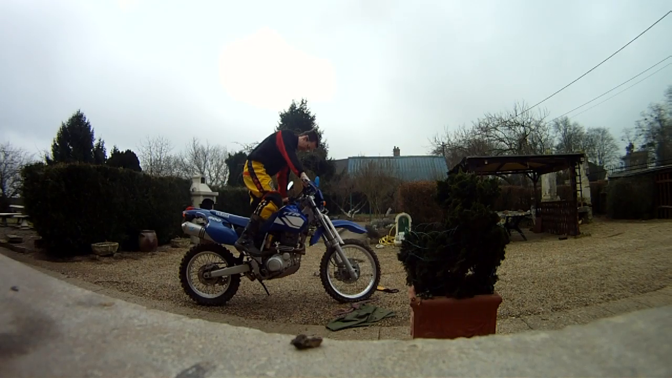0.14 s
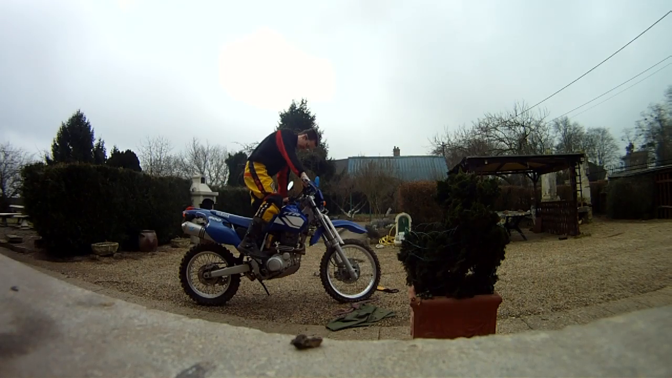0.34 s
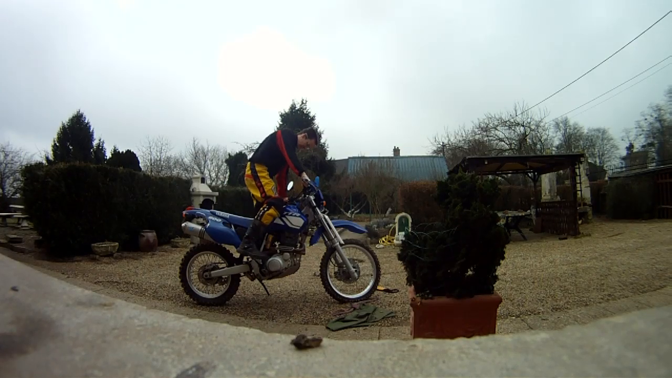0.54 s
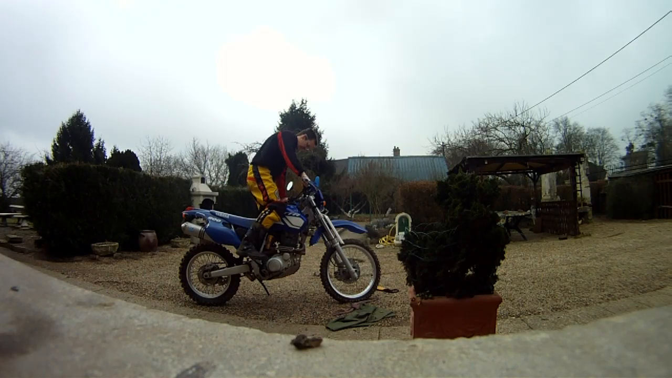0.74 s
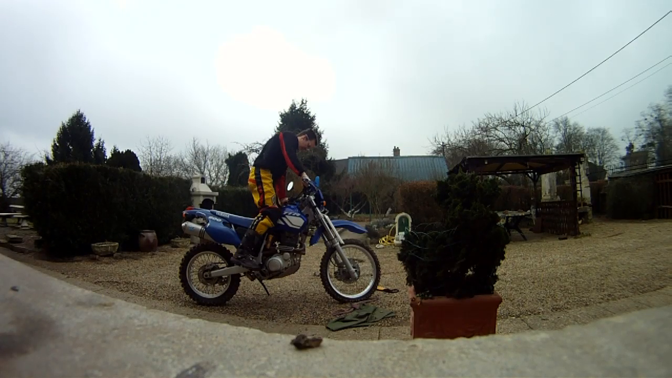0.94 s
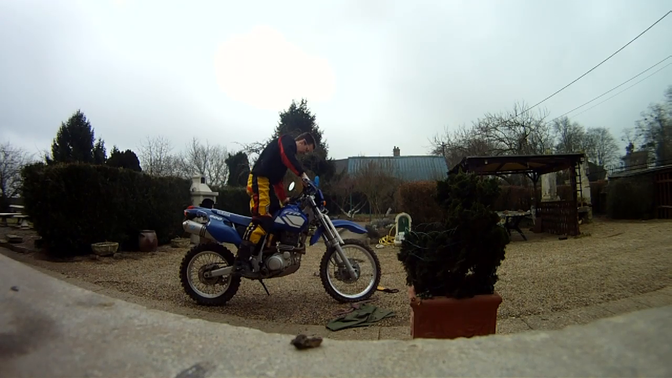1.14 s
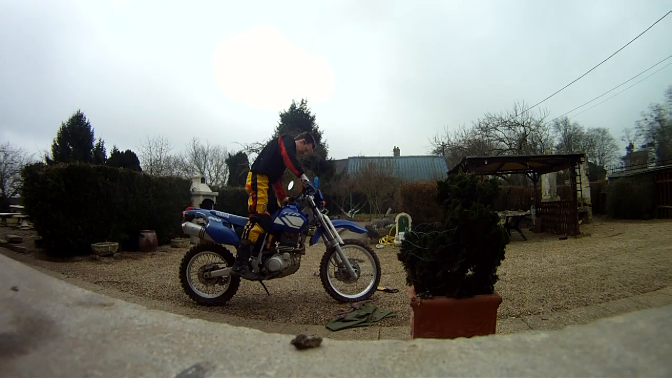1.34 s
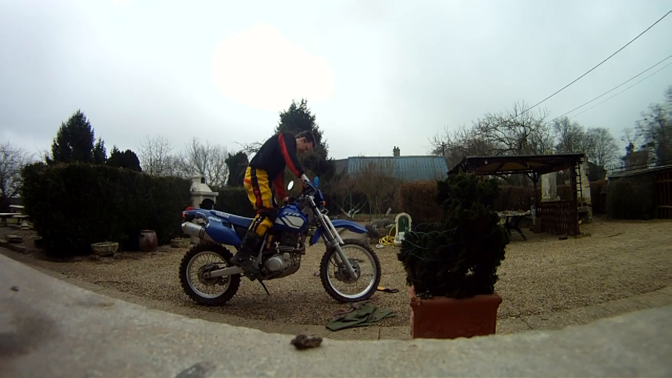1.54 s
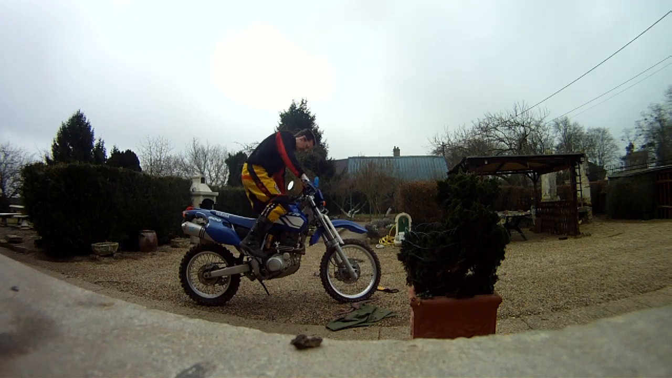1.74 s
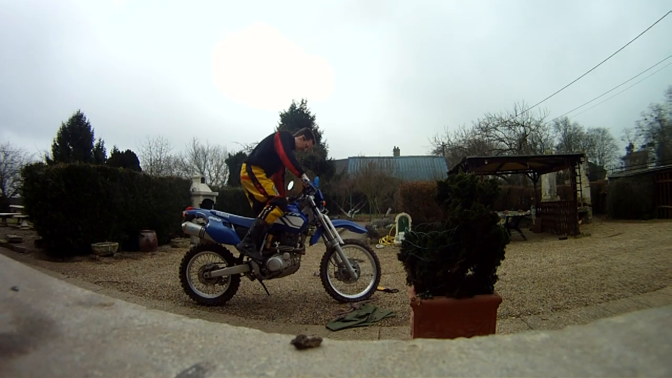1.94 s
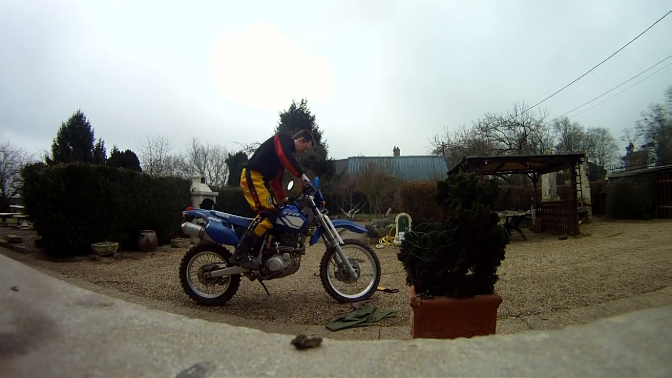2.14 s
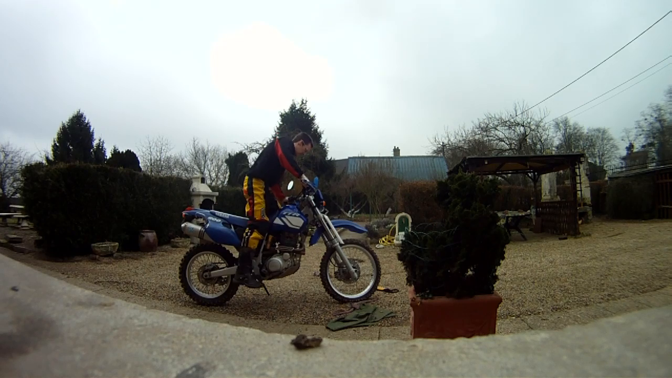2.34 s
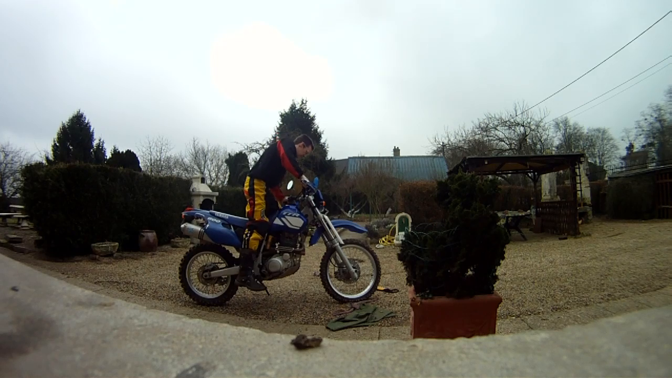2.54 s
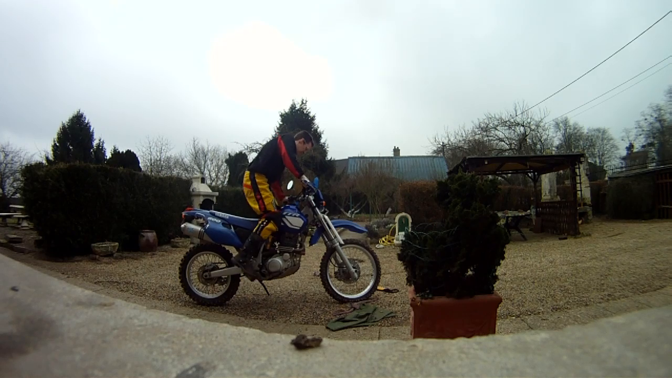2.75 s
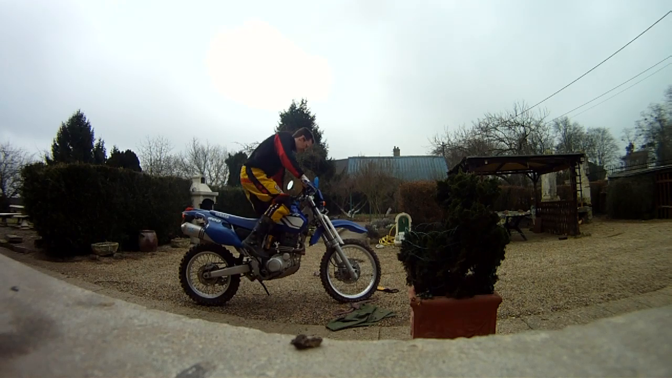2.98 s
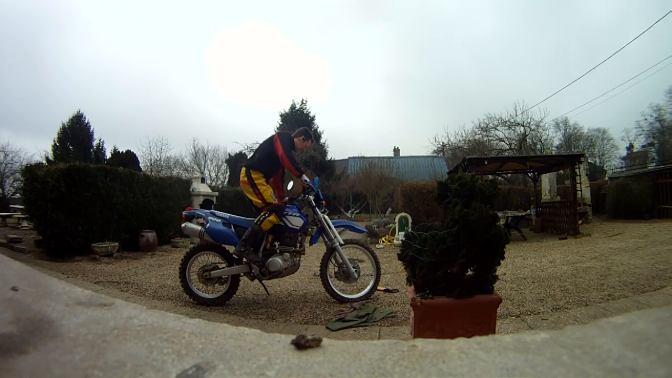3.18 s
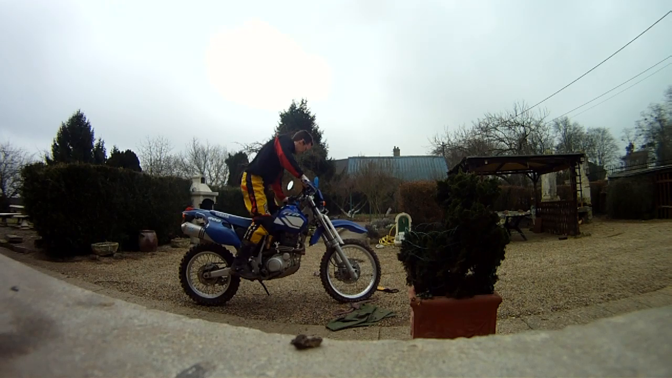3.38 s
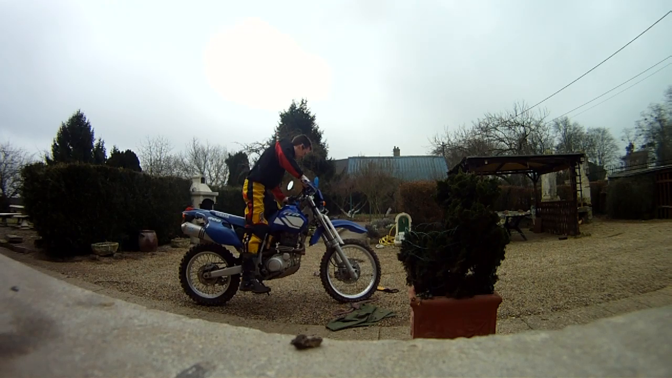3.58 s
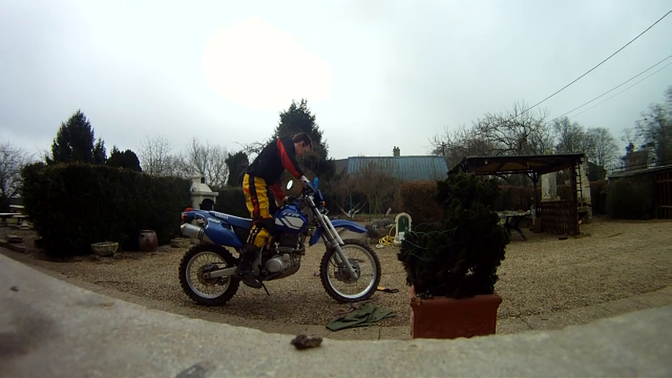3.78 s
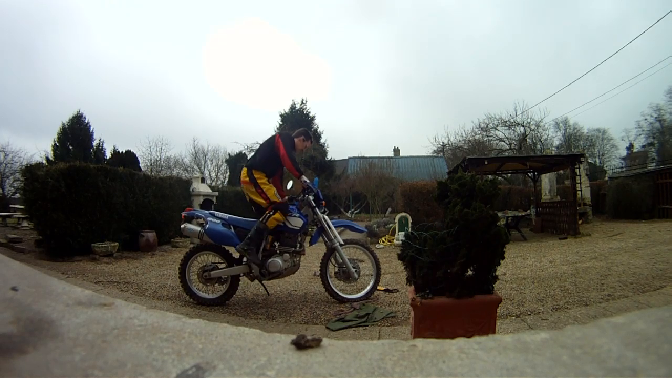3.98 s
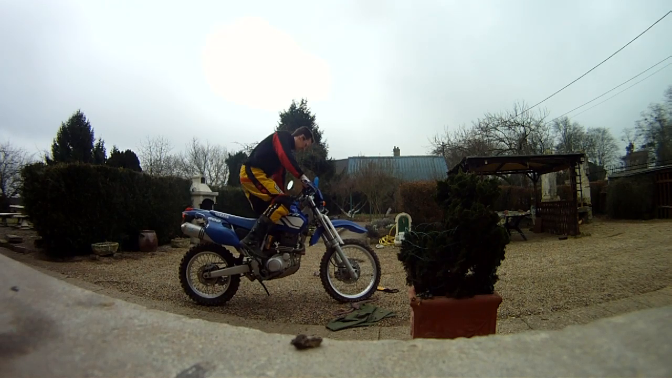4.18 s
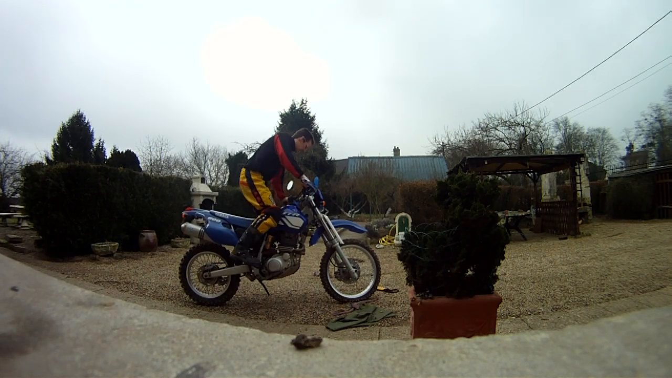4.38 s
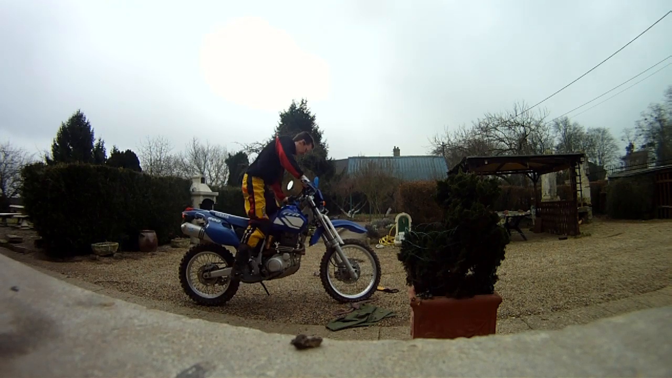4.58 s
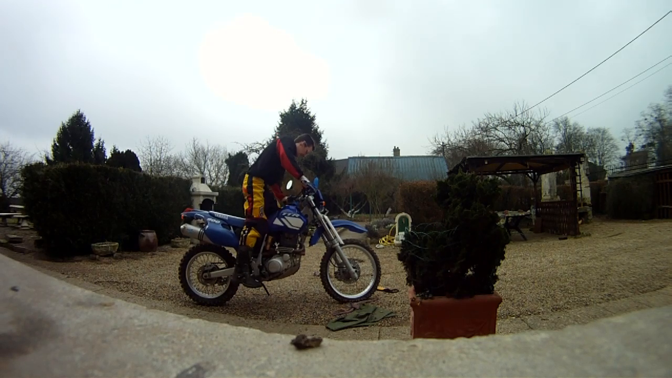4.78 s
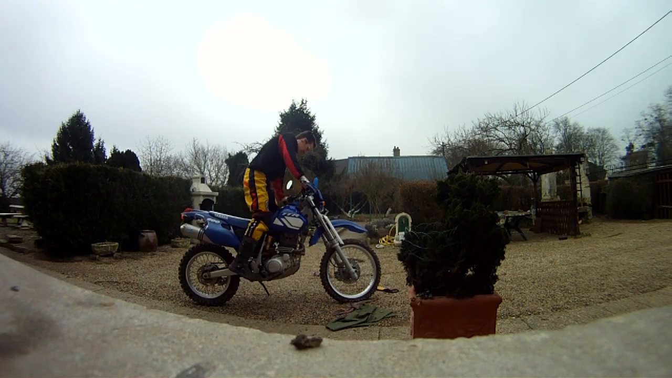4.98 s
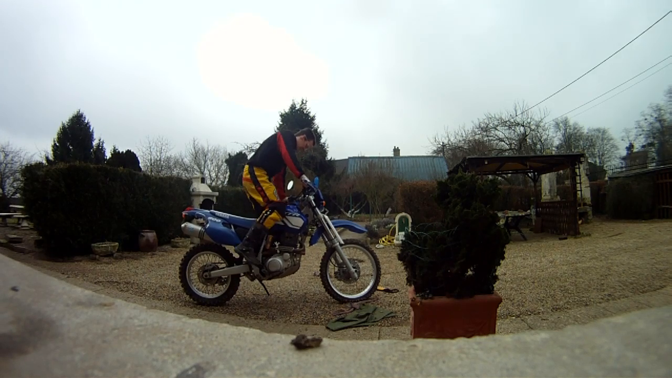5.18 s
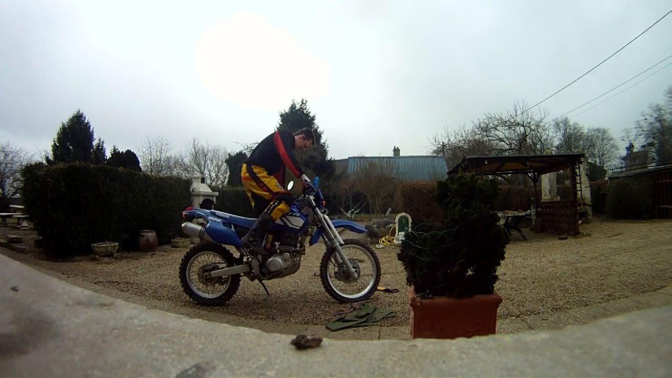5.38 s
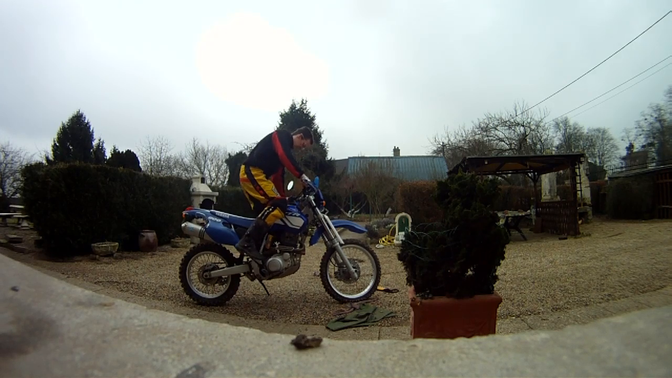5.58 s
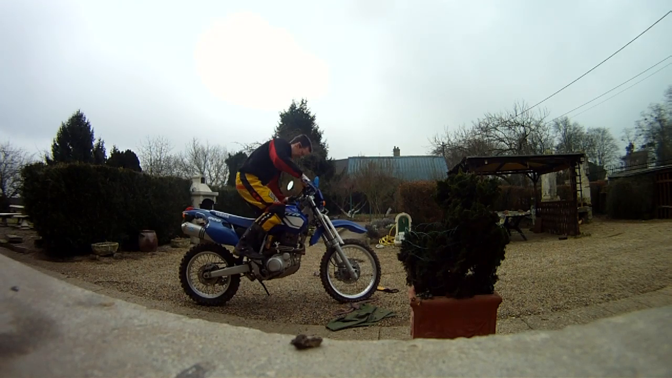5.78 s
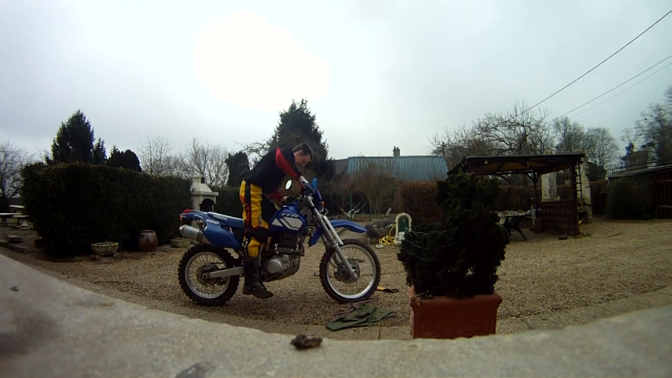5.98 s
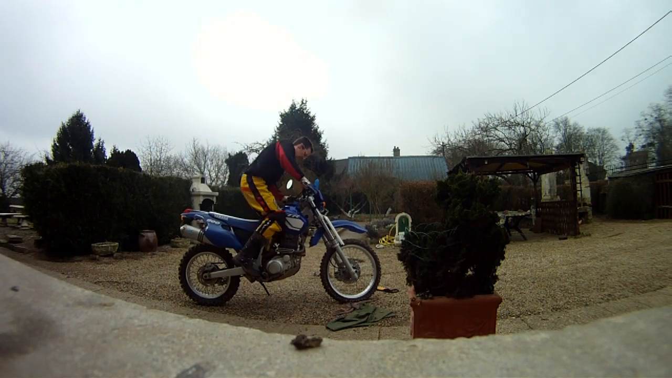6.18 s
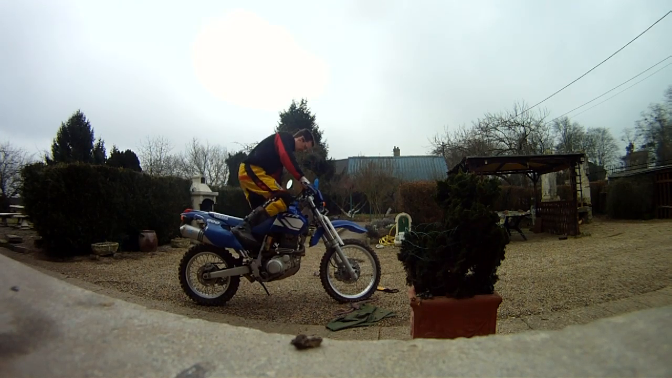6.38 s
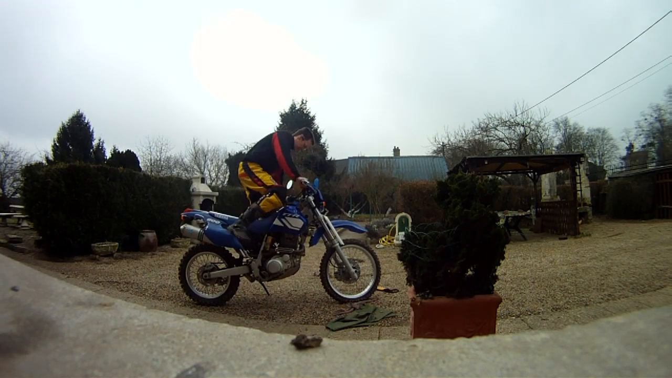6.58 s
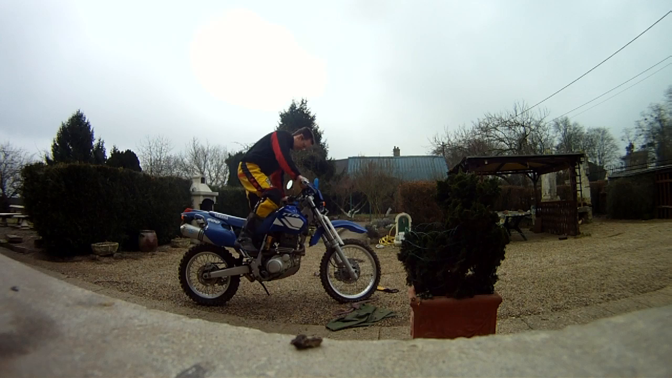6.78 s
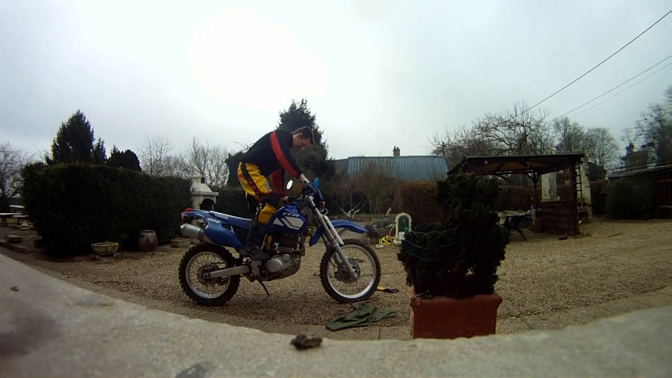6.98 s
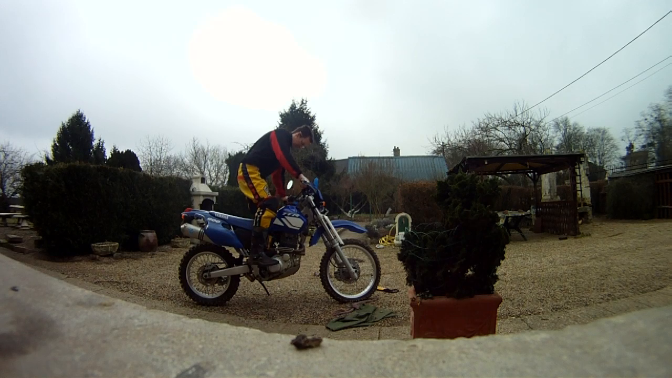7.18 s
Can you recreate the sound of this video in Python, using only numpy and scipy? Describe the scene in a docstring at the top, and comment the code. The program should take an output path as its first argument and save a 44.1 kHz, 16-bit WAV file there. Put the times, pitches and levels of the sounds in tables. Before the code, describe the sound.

Ratchet ticks and hard metallic clunks of repeated kick-starting in an open yard, after a bird's song, until a single-cylinder motorbike catches and stumbles alive.

```python
"""In a yard, a single-cylinder motorbike is kick-started: ratchet ticks and stop clunks ring as fading steel tones,
then the engine catches, stumbles and picks up, its firings sent as pressure pulses that bounce in the pipe.
A finch ends its song in the hedge as swept whistles; far traffic, scuffs and rustle are coloured noise.
The single microphone samples at a low rate and holds, so every sound has mirror images in the treble."""
import sys
import numpy as np
from scipy import signal
from scipy.fft import rfft, irfft, next_fast_len
from scipy.io import wavfile
from scipy.ndimage import uniform_filter1d, map_coordinates

SR = 44100
rng = np.random.default_rng(int(sys.argv[2]) if len(sys.argv) > 2 else 0)


def master(y):
    """Save y as 16-bit WAV."""
    cut = np.clip(np.atleast_2d(y).T, -1, 1)
    pcm = np.round(cut * 32767)  # scale
    wavfile.write(sys.argv[1], SR, pcm.astype(np.int16))


N = 318843
T = np.arange(N) / SR


def amp(db):
    """Turn decibels into a plain multiplier."""
    return 10 ** (np.asarray(db) / 20)


def unit(x):
    """Scale a sound to an rms of 1."""
    return x / np.sqrt(np.mean(x ** 2) + 1e-20)


def along(points, hz):
    """Read (Hz, dB) points on a log frequency axis; beyond the points it is -120 dB."""
    point_hz, point_db = np.transpose(points)
    return np.interp(np.log(hz + 1), np.log(point_hz + 1), point_db, -120, -120)


def curves(rows, t=T):
    """Draw straight lines through the rows: one curve over time for each column after the first."""
    seconds, *columns = np.transpose(rows)
    return [np.interp(t, seconds, column) for column in columns]


def wobble(rate):
    """A smooth random curve with this many random knots a second."""
    knots = rng.standard_normal(int(N * rate / SR) + 4)
    return map_coordinates(knots, [T * rate])


def filtered(x, response):
    """Multiply the spectrum of x by a response of frequency."""
    m = next_fast_len(N + SR // 2)
    return irfft(rfft(x, m) * response(np.fft.rfftfreq(m, 1 / SR)), m)[:N]


def noise(spectrum, grain=1):
    """Coloured noise of rms 1; grain shapes its loudness before colouring."""
    source = grain * rng.standard_normal(N)
    return unit(filtered(source, lambda hz: amp(along(spectrum, hz))))


def patchy(spectrum, depth_db):
    """Coloured noise of rms 1 whose bands swell and fade on their own."""
    z = signal.stft(noise(spectrum), nperseg=512)[2]
    field = uniform_filter1d(rng.standard_normal(z.shape), size=5, axis=0)
    field = uniform_filter1d(field, size=8, axis=1)
    return unit(signal.istft(z * amp(depth_db * unit(field)), nperseg=512)[1][:N])


def add(track, s, x):
    """Mix x into the track from time s, leaving out what falls outside it."""
    i = round(s * SR)
    x = x[max(-i, 0):]
    part = track[max(i, 0):][:len(x)]
    part += x[:len(part)]


def fade(t, db, t60):
    """A level that starts at db and falls by 60 dB in t60 seconds."""
    return amp(db - 60 * t / t60)


def onset(t, rise_s):
    """A quick, rounded rise from 0 towards 1."""
    return 1 - np.exp(-t / rise_s)


def stroke(t60):
    """A quick rise, then a decay that closes within a quarter second."""
    t = np.arange(SR // 4) / SR
    return onset(t, 0.0013) * fade(t, 0, t60) * np.cos(2 * np.pi * t)


# How long the yard echoes. Each row: frequency in Hz, time to fall by 60 dB in seconds.
YARD_ECHO = [(200, 0.47), (2000, 0.17), (5000, 0.24)]


def echoes(x, chunk=SR // 8):
    """The yard's answer is a tail of fading noise; each eighth of a second finds its own scatter paths."""
    out = np.zeros(N)
    wall_hz, t60 = np.transpose(YARD_ECHO)
    for i in range(0, N, chunk):
        hz, t, z = signal.stft(rng.standard_normal(SR // 2), SR, nperseg=256)
        fading = fade(t, 0, np.interp(hz, wall_hz, t60)[:, None])
        tail = signal.istft(z * fading, SR, nperseg=256)[1]
        add(out, i / SR + .004, signal.fftconvolve(x[i:i + chunk], tail / np.linalg.norm(tail)))
    return out


# Loudness of the yard. Each row: time in seconds, traffic in dB, boot scuffs in dB, rustle in dB.
YARD_LEVELS = [(0.0, -50, -57, -63), (0.43, -53, -65.5, -67), (0.85, -51.5, -60.5, -64),
               (1.15, -48.5, -56.5, -52), (1.61, -51.5, -63, -60), (2.33, -52.5, -55, -58),
               (2.7, -52, -60, -57.5), (2.86, -52.5, -57, -57), (3.6, -49.5, -55, -58),
               (3.76, -53, -61, -59), (4.14, -52.5, -58, -65), (4.65, -51.5, -59, -60),
               (5.21, -53.5, -61.5, -63), (5.9, -55, -61.5, -67)]
# Colours of the traffic, scuffs and rustle. Each row: frequency in Hz, level in dB per Hz.
TRAFFIC_COLOUR = [(15, -41), (25, -8), (81, -7), (139, -6), (234, -3.5), (300, -16), (390, -47),
                  (660, -120)]
SCUFF_COLOUR = [(170, -37), (290, -11), (351, 0), (438, -7.5), (539, -1), (687, -11.5), (900, -30.5),
                (1170, -43), (1980, -120)]
RUSTLE_COLOUR = [(470, -38.5), (800, -3), (1520, -6), (1960, -1.5), (2430, -5), (3150, -3.5), (3980, -16),
                 (5030, -16), (5900, -43), (7670, -90), (13000, -120)]


def yard():
    """Far traffic, boots on the pegs and gravel, and a faint rustle around the rider, all uneven noise."""
    traffic_db, scuff_db, rustle_db = curves(YARD_LEVELS)
    swell = amp(3.0 * wobble(7.5) + 0.97 * wobble(30))
    traffic = amp(traffic_db) * noise(TRAFFIC_COLOUR, swell)
    scuffs = amp(scuff_db) * patchy(SCUFF_COLOUR, depth_db=4.0)
    rustle = amp(rustle_db) * patchy(RUSTLE_COLOUR, depth_db=3.5)
    return traffic + scuffs + rustle


def whistle(ms, shape, hoarse_hz):
    """One note with soft ends: its pitch bends through three points and shakes at random."""
    u = np.linspace(0, 1, round(ms * SR / 1000))
    hz = np.polyval(np.polyfit([0, .5, 1], shape[:3], 2), u)
    shake = uniform_filter1d(rng.standard_normal(2500), size=40)[:len(u)] * np.sqrt(40)
    hz = hz + hoarse_hz * shake
    db = np.interp(u, [0, .5, 1], shape[3:])
    ends = np.clip(np.minimum(u, 1 - u) * ms / 1.8, 0, 1)
    return np.sqrt(2) * amp(db) * ends * np.sin(2 * np.pi * np.cumsum(hz) / SR)


# The notes of the finch's two repeated syllables. Each row: delay in ms, length in ms,
# pitch in Hz at start, middle and end, level in dB at start, middle and end.
# Each singing scales the delays and pitches, and shifts the levels.
OPENING_NOTES = [(0, 5.8, 5400, 4500, 2800, -4, -12, -18), (7.55, 18, 2680, 3650, 4050, -4.5, -1.5, -0.5),
                 (18.5, 34, 4100, 4130, 4100, 0, -7, -16), (54.3, 23, 5400, 4550, 4400, -15, -3.5, -9)]
TRILL_NOTES = [(0, 20, 4330, 3500, 2750, -18, -3, 0), (21, 7, 4800, 4300, 3700, -26, -22, -14),
               (28, 11, 3600, 2950, 2550, -6, 1, -1), (39, 14, 2550, 2250, 2050, -4, -9, -16),
               (69, 23, 3800, 3600, 3450, -9, -1, -2)]
# When it sings each syllable. Each row: start in seconds, level in dB, pitch factor.
OPENING_TIMES = [(-.066, -56, 1.05), (.077, -48.5, 0.98), (.22, -50, .99), (.359, -46.5, 1.01)]
TRILL_TIMES = [(0.476, -39, 1.1), (.6, -35, 1.058), (.725, -33, 1.007), (.852, -33, 1), (.981, -32, 1.01),
               (1.107, -31, .97)]
# Single notes of the closing flourish. Each row: start in seconds, length in ms,
# pitch in Hz at start, middle and end, level in dB at start, middle and end.
FLOURISH_NOTES = [(1.25, 25, 3700, 4900, 3420, -45, -47.5, -47),
                  (1.272, 19, 3980, 2800, 1900, -34.5, -41, -55),
                  (1.509, 29, 3680, 3850, 3800, -64, -59, -55),
                  (1.535, 30, 4360, 5200, 4600, -55, -58, -58),
                  (1.54, 34, 2160, 2900, 3490, -57, -54, -44.5),
                  (1.576, 53, 3920, 3400, 2913, -58, -55, -46),
                  (1.585, 28, 4440, 4100, 3920, -59, -57, -63)]
# The quick warble within the flourish. Each row: time in seconds, level in dB.
WARBLE_LEVELS = [(1.299, -23.5), (1.342, -23), (1.358, -32.5), (1.378, -27), (1.397, -26.5), (1.412, -35),
                 (1.425, -25), (1.435, -60)]
WARBLE_RATE_HZ = 54  # swings a second
WARBLE_TOP_HZ, WARBLE_DROP_HZ, WARBLE_WAVER_HZ = 2830, 850, 90


def finch():
    """Two repeated syllables, their notes closer together when higher, then a hoarse flourish with a warble."""
    song = np.zeros(N)
    for syllable, times in ((OPENING_NOTES, OPENING_TIMES), (TRILL_NOTES, TRILL_TIMES)):
        for s, db, factor in times:
            for delay_ms, ms, *shape in syllable:
                sung = np.r_[np.multiply(shape[:3], factor), shape[3:]]
                add(song, s + delay_ms / factor / 1000, amp(db) * whistle(ms, sung, hoarse_hz=30))
    for s, ms, *shape in FLOURISH_NOTES:
        add(song, s, whistle(ms, shape, hoarse_hz=170))
    t = np.arange(WARBLE_LEVELS[0][0], WARBLE_LEVELS[-1][0], 1 / SR)
    db, = curves(WARBLE_LEVELS, t)
    depth = (1 - np.cos(2 * np.pi * WARBLE_RATE_HZ * (t - 1.303))) / 2
    loud = amp(-18 * depth ** .5)  # loudest at the top of each swing
    hz = WARBLE_TOP_HZ - WARBLE_DROP_HZ * depth + WARBLE_WAVER_HZ * wobble(151)[:len(t)]
    add(song, t[0], amp(db) * loud * np.sin(2 * np.pi * np.cumsum(hz) / SR))
    return song * amp(2.34 * wobble(290))  # the voice flutters


# The boot thuds on lever and frame. Each row: start in seconds, knock level in dB,
# level of the deep thump against the knock in dB.
BOOT_THUDS = [(0.943, -39.5, -5), (1.19, -45, -5), (1.921, -46, -6), (2.031, -41.5, 1), (2.09, -45.5, -2),
              (2.903, -52, -13), (3.234, -44, 0), (3.551, -46, -1), (3.654, -45, 1), (4.317, -40.5, -2.5),
              (4.406, -39, -6), (4.692, -40.5, 2.5), (5.394, -40.5, -8.5), (5.595, -49, -1.5)]
# Colour of the intake, also of dull knocks. Each row: frequency in Hz, level in dB per Hz.
INTAKE_COLOUR = [(250, -24), (330, -7.5), (385, -1.5), (450, -1), (600, -9), (900, -17.5), (1400, -13.5)]
KNOCK_T60_S, THUMP_T60_S = 0.13, 0.31


def boot():
    """Each thud is a dull knock over a deeper, slower thump, both fading noise."""
    knock, thump, t = np.zeros(N), np.zeros(N), np.arange(SR // 3) / SR
    for s, db, deep_db in BOOT_THUDS:
        add(knock, s, fade(t, db, KNOCK_T60_S) * onset(t, .0015))
        add(thump, s, fade(t, db + deep_db, THUMP_T60_S) * onset(t, 0.0033))
    return knock * noise(INTAKE_COLOUR) + thump * noise(TRAFFIC_COLOUR)


def sliding(rows, shake_db, shake_hz):
    """A tone that follows the rows, unsteady in level and pitch."""
    out, t = np.zeros(N), np.arange(rows[0][0], rows[-1][0], 1 / SR)
    hz, db = curves(rows, t)
    hz = hz + shake_hz * wobble(411)[:len(t)]
    db = db + 2.5 + shake_db * wobble(121)[:len(t)]
    ends = np.clip(np.minimum(t - t[0], t[-1] - t) / 0.0088, 0, 1)
    add(out, t[0], amp(db) * ends * np.sin(2 * np.pi * np.cumsum(hz) / SR))
    return out


# Ratchet ticks. Each row: start in seconds, overall level in dB, extra low ring in dB, extra top in dB.
RATCHET_TICKS = [(0.0854, -34.5, -7.5, -30), (0.4727, -40.5, -9, -24), (1.6948, -27.5, -8, -26),
                 (1.7804, -24, -0.5, -23.5), (1.8552, -22, -3.5, -24.5), (1.8762, -29, -15, -12),
                 (2.0328, -37.5, 4, -16), (2.0702, -37, -9, -18), (2.0889, -25, -4, -14),
                 (2.7364, -21, -4, -26.5), (2.7894, -22.5, 1, -21.5), (2.8454, -21.5, -3.5, -21),
                 (2.9031, -23, 1, -19), (2.9615, -22, -2, -16), (3.028, -22, -1, -22),
                 (3.043, -32.5, -23, -6), (3.234, -21, -6, -17.5), (3.8936, -21.5, -0.5, -22),
                 (3.9503, -20.5, -4.5, -25), (4.0064, -21.5, -1.5, -22), (4.0626, -24, -0.5, -20.5),
                 (4.1198, -20.5, -1, -18), (4.1664, -28.5, -1, -11), (4.3171, -34, 3.5, -19),
                 (4.3694, -23, -1, -17), (4.4048, -29, -7, -35), (4.863, -40, 0.5, -16),
                 (4.8826, -44, -2, -15.5), (5.1123, -26.5, -8, -30), (5.2264, -25.5, 0, -27),
                 (5.3095, -24.5, -4.5, -29), (5.3929, -22.5, -1, -15), (5.659, -41, -5, -20.5),
                 (5.8884, -24, -2.5, -18)]
# The lever hits its stop. Each row: start in seconds, overall level in dB, extra low ring in dB,
# extra top in dB, exhaust puff in dB.
STOP_CLUNKS = [(0.944, -20, -1.5, -19, -70), (1.178, -1.5, -12.5, -19.5, -33),
               (2.3982, -7.5, -12.5, -22.5, -47), (3.5281, -10, -11.5, -19, -56),
               (4.6875, -1.5, -11, -19.5, -25.5), (6.0617, -8.5, -9, -21.5, -26),
               (6.1319, -8, 1, -18.5, -42)]
# Ringing tones of the steel lever and case. Each row: pitch in Hz before a small random shift, level in dB
# before the contact's own, time to fall by 60 dB in seconds before the contact's scaling.
STEEL_TONES = [(1265, -5.5, 0.032), (1560, -20, 0.0099), (1783, -5.5, 0.032), (1810, -9, 0.098),
               (2165, -10.5, 0.026), (2370, -6, 0.053), (2690, 2, 0.012), (2814, 6, 0.021),
               (3090, -4.5, 0.023), (3400, -16.5, 0.076), (4180, -14, .015), (5550, -7, 0.021)]
# Rattle of loose parts in three regions, low to high. Each row: frequency in Hz, level in dB per Hz.
RATTLE_COLOURS = [
    [(600, -17.5), (1000, -10.5), (1300, -4.5), (1800, 2), (2200, -2), (2500, -32)],
    [(1900, 0), (2250, -8), (2900, 2), (3300, -4.5), (3700, -17), (4100, -41)],
    [(3400, -11.5), (3900, -2.5), (4500, -9.5), (5200, -2.5), (5900, -7)],
]
# The lever's pivot drags, twice. Each row: time in seconds, pitch in Hz, level in dB before a fixed lift.
PIVOT_SQUEAKS = [
    [(2.23, 1933, -72), (2.28, 1930, -60), (2.34, 1921, -74)],
    [(3.68, 1870, -59), (3.716, 1800, -46), (3.75, 1730, -55.5), (3.89, 1780, -70)],
]
# Starter gears spin the crank. Each row: time in seconds, pitch in Hz, level in dB before a fixed lift.
GEAR_WHIRR = [(5.96, 360, -61), (6.004, 364.6, -41), (6.024, 399, -51), (6.052, 358, -45), (6.09, 369, -30),
              (6.115, 368, -39)]
TICK_BODY_DB, CLUNK_BODY_DB = -28, -33  # dull body of a contact, against its overall level


def lever():
    """Every contact rings the steel at new strengths, with a short rattle; hard stops also puff the exhaust."""
    out, rattle, body, t = np.zeros(N), np.zeros((3, N)), np.zeros(N), np.arange(SR // 4) / SR
    contacts = ((RATCHET_TICKS, .0012, -9, 1.01, TICK_BODY_DB), (STOP_CLUNKS, .0006, -10, .8, CLUNK_BODY_DB))
    for rows, rise_s, gain_db, lasting, body_db in contacts:
        rising = onset(t, rise_s)
        for s, db, low_db, top_db, *puff in rows:
            luck = rng.standard_normal((len(STEEL_TONES), 2))
            for (hz, level, t60), (strength, detune) in zip(STEEL_TONES, luck):
                tone_db = db + gain_db + level + 3 * strength
                tone_db += (low_db + 6) * (hz < 2000) + top_db * (hz > 3700)
                ring = np.sin(2 * np.pi * hz * (1 + 0.004 * detune) * t)
                add(out, s, fade(t, tone_db, t60 * lasting) * rising * ring)
            # the rattle dies fast at first, then slowly
            dying = (fade(t, db - 11.5, 0.029) + fade(t, db - 20.5, 0.11)) * rising
            for region, share_db in zip(rattle, (low_db + 1.0, 0, top_db + 8.5)):
                add(region, s, amp(share_db) * dying)
            add(body, s, fade(t, db + body_db, 0.17) * rising)
            for puff_db in puff:
                hum = np.sin(2 * np.pi * 80 * t)
                push = np.sin(2 * np.pi * 36 * t)
                add(out, s + 0.0098, fade(t, puff_db, 0.37) * onset(t, 0.0078) * hum)
                add(out, s, fade(t, puff_db - 4.5, 0.2) * onset(t, 0.0036) * push)
    for rows in PIVOT_SQUEAKS:  # stick and slip
        out += sliding(rows, shake_db=5.0, shake_hz=70)
    out += sliding(GEAR_WHIRR, shake_db=1.0, shake_hz=21.5)
    for region, colour in zip(rattle, RATTLE_COLOURS):
        out += region * noise(colour)
    return out + body * noise(INTAKE_COLOUR)


# Loudness of the running engine. Each row: time in seconds, valve clatter in dB, intake in dB,
# both before a fixed trim.
ENGINE_LEVELS = [(5.93, -66.5, -56), (6.05, -37.5, -39.5), (6.115, -54, -43), (6.13, -35.5, -39),
                 (6.145, -22, -17.5), (6.172, -25.5, -33), (6.29, -16, -33.5), (6.42, -23.5, -35),
                 (6.468, -36.5, -38), (6.52, -28.5, -29), (6.56, -37.5, -48), (6.6, -33, -32.5),
                 (6.75, -30.5, -39), (6.95, -17, -31), (7.01, -22.5, -31.5), (7.2, -22, -36),
                 (7.23, -63, -35)]
# Colour of the metal noise. Each row: frequency in Hz, level in dB per Hz.
CASE_COLOUR = [(290, -38), (500, -18.5), (1060, -14), (1280, -8), (1660, -6), (1780, 3), (1930, -3),
               (2330, 0), (2560, -8), (2860, 2), (3900, -23), (5270, -24.5), (5900, -63), (7670, -71),
               (13000, -120)]
FIZZ_DB, BURST_FIZZ_DB = -16.5, -20.5  # gas leaking past the valves, against the clatter and a burst


def running_gear():
    """Valve gear and piston clatter in dense uneven grains; the intake breathes along as low noise."""
    silence = (ENGINE_LEVELS[0][0] - .05, -90, -90)
    clatter_db, intake_db = curves([silence] + list(ENGINE_LEVELS))
    clatter = noise(CASE_COLOUR, amp(2.5 * wobble(300) + 1.5 * wobble(70)))
    clatter += amp(FIZZ_DB) * noise(RATTLE_COLOURS[2], amp(3.8 * wobble(200)))
    intake = noise(INTAKE_COLOUR, amp(3.8 * wobble(60)))
    return amp(clatter_db - 5.5) * clatter + amp(intake_db - 3.0) * intake


# Bursts of valve noise from the running engine. Each row: start in seconds, level in dB before a fixed trim.
VALVE_BURSTS = [(6.1876, -10.5), (6.2414, -9.5), (6.321, -16), (6.3435, -17), (6.381, -34), (6.487, -18),
                (6.515, -17.5), (6.5737, -15), (6.5993, -19.5), (6.675, -18.5), (6.6905, -19),
                (6.757, -7.5), (6.8173, -9), (6.865, -10), (6.8933, -9.5), (6.94, -11.5), (6.974, -12),
                (7.0216, -19), (7.077, -32), (7.102, -15.5), (7.1446, -17.5), (7.168, -9.5), (7.196, -9.5)]


def bursts():
    """Each burst is bright metal noise with a fizz on top, rising at once and fading."""
    envelope = np.zeros(N)
    for s, db in VALVE_BURSTS:
        add(envelope, s, amp(db - 9.0) * stroke(0.091))
    fizz = amp(BURST_FIZZ_DB) * noise(RATTLE_COLOURS[2])
    return envelope * (patchy(CASE_COLOUR, depth_db=1.0) + fizz)


# The engine's firings. Each row: time in seconds, pulse level in dB, first reflection against it in dB,
# further change at each later trip in dB.
ENGINE_FIRINGS = [(6.082, -29.5, -13, -4), (6.142, -15, -7, -4.5), (6.194, -6, -6.5, -1.5),
                  (6.264, -8.5, -3, -2), (6.346, -5.5, -2.5, -5.5), (6.427, -10, 2.5, -16),
                  (6.519, -4.5, -4.2, -5), (6.601, -13.5, -1.5, -4.5), (6.695, -6.5, -6, -1.5),
                  (6.769, -4, -5.5, -3), (6.824, -5, -10, -1.5), (6.866, -13, -8, -0.5),
                  (6.907, -8, -23, -10), (6.943, -7, -8, -20), (6.986, -6, -6.5, -21),
                  (7.026, -15, 4, -4.5), (7.07, -9, 0, -9), (7.108, -15, -3.5, 0.5), (7.153, -13, -3, -6.5),
                  (7.172, -15, -6.5, -1), (7.207, -6, -15, 0)]
# Heat of the exhaust gas. Each row: time in seconds, heat from 0 to 1.
GAS_HEAT = [(6.35, 0.05), (6.6, 0.25), (6.7, 0.26), (6.87, 0.83), (6.98, 0.06), (7.2, .2)]
# Colours of the gas in the pipe mouth and of the silencer shell. Each row: frequency in Hz, level in dB per Hz.
CHUFF_COLOUR = [(200, -13), (350, 2.5), (500, -2), (800, -6.5), (1200, -9), (1800, -35)]
SHELL_COLOUR = [(20, -4), (45, 2.5), (84, 6), (150, -16), (230, -3.5), (300, -21.5)]
COLD_TRIP_MS, HOT_SAVES_MS = 13.6, 3.46  # round trip in the pipe; hot gas carries the pulse faster
LATER_TRIP_SHARE = .9  # later trips are shorter than the first
CHUFF_DB, CHUFF_HOT_DB, CHUFF_LEAD_S = -29, 17.5, .006  # gas at the mouth: against the firing, lift by heat
SHELL_DB, SHELL_T60_S = -15.5, 0.38  # the silencer shell, against the firing that shakes it


def exhaust():
    """Each firing sends a pressure pulse down the pipe; it returns again and again, changed in level and rounder."""
    out, chuff, shell = np.zeros(N), np.zeros(N), np.zeros(N)
    t = np.arange(-SR // 30, SR // 30) / SR
    for s, db, first_db, change_db in ENGINE_FIRINGS:
        heat, = curves(GAS_HEAT, s)
        trip_s = (COLD_TRIP_MS - HOT_SAVES_MS * heat) / 1000
        for k in range(8):  # 0 is the pulse itself, then its returns
            width_s = 0.0018 * (1 + 0.19 * k)
            u = (t / width_s) ** 2
            level_db = db + (first_db + (k - 1) * change_db) * (k > 0)
            delay_s = trip_s * (min(k, 1) + LATER_TRIP_SHARE * max(k - 1, 0))
            add(out, s + delay_s + t[0], amp(level_db) * (1 - u) * np.exp(-u / 2))
        add(chuff, s - CHUFF_LEAD_S, amp(db + CHUFF_DB + CHUFF_HOT_DB * heat) * stroke(0.11))
        add(shell, s, amp(db + SHELL_DB) * stroke(SHELL_T60_S))
    return out + chuff * noise(CHUFF_COLOUR) + shell * noise(SHELL_COLOUR)


def scene():
    """Mix all sources, with the yard's echo of the metal, the bird and the pipe."""
    background = yard()
    bird, metal, pipe = finch(), lever(), exhaust()
    wet = echoes(amp(-10.5) * metal + amp(-5.0) * bird + amp(-15.0) * pipe)
    mix = background + bird + boot() + metal + running_gear() + bursts() + pipe + wet
    return np.tile(mix, (2, 1))


# Colour of the microphone's noise. Each row: frequency in Hz, level in dB per Hz before scaling to the hiss level.
HISS_COLOUR = [(500, -15), (2000, -3), (5800, 0)]
SAMPLING_HZ = 12000
ROLL_HZ, TOP_HZ = 15350, 16500  # 30 dB weaker from the first, silent from the second


def record(dry):
    """One microphone, softly limited, band-limited, sampled and held: images mirror around the sampling rate."""
    sound = dry[0] + amp(-73.5) * noise(HISS_COLOUR)
    sound = sound / (1 + np.abs(sound / .8) ** 4) ** (1 / 4)

    def band_limit(hz):
        lift = 1 / np.maximum(np.abs(np.sinc(hz / SAMPLING_HZ)), .5)  # makes up for the hold's treble loss
        return lift / (1 + (hz / 5650) ** 30)

    def hold(hz):
        roll = np.where(hz < ROLL_HZ, 1, amp(-30))
        return np.sinc(hz / SAMPLING_HZ) * roll * (hz < TOP_HZ)

    sound = filtered(sound, band_limit)
    sampled = sound * (1 + 2 * np.cos(2 * np.pi * SAMPLING_HZ * T))  # adds the mirror images
    return np.tile(filtered(sampled, hold), (2, 1))


dry = scene()
out = record(dry)
master(out)
```